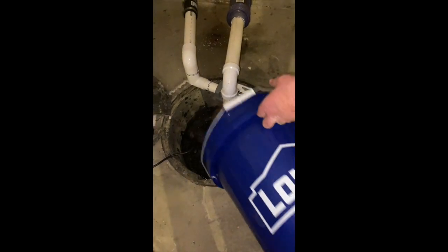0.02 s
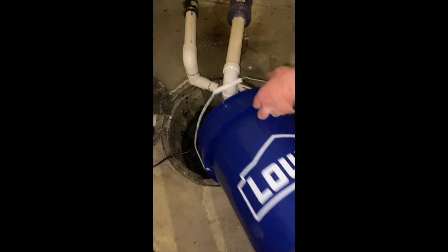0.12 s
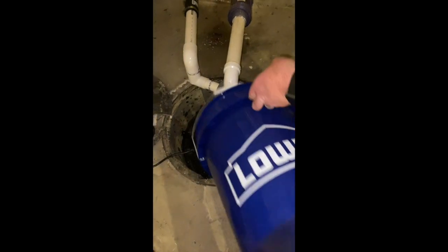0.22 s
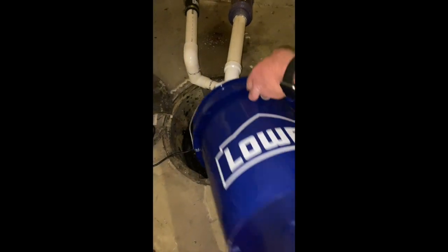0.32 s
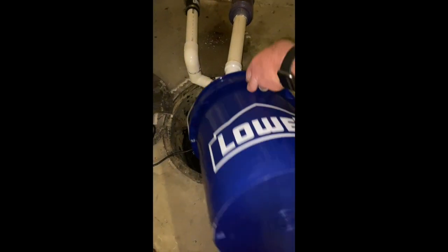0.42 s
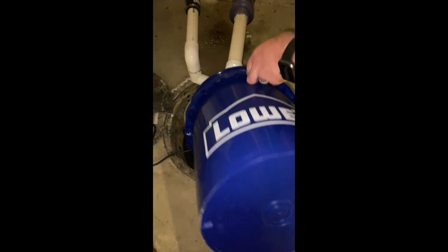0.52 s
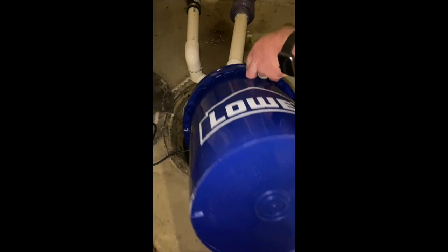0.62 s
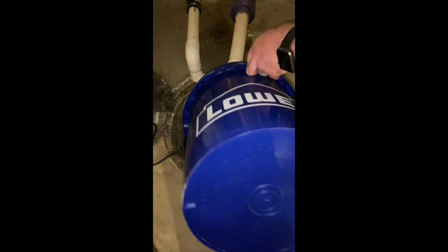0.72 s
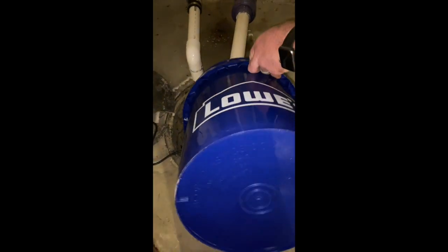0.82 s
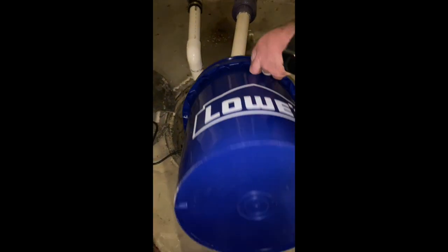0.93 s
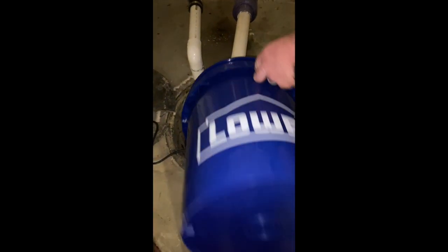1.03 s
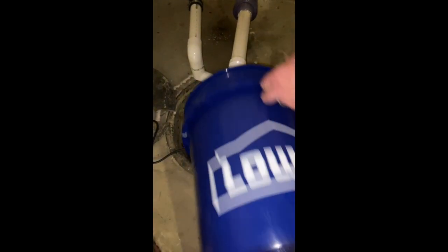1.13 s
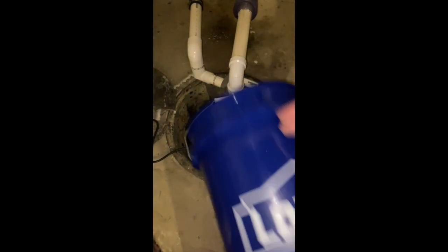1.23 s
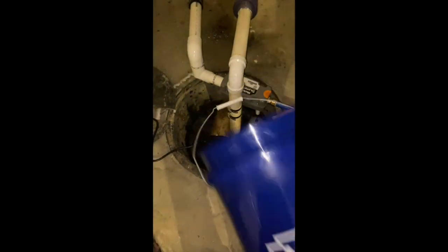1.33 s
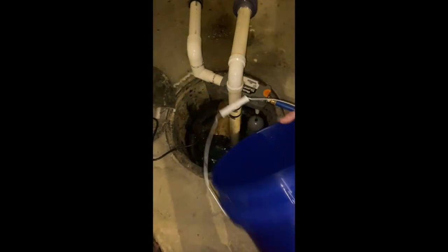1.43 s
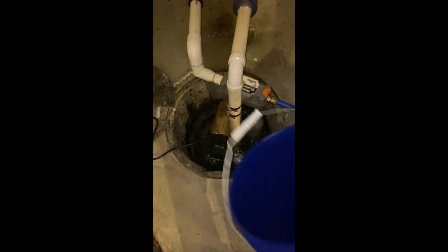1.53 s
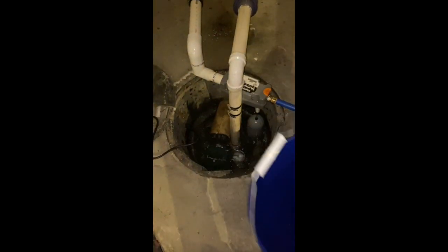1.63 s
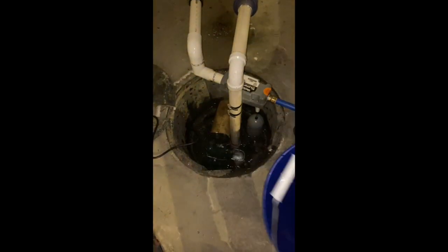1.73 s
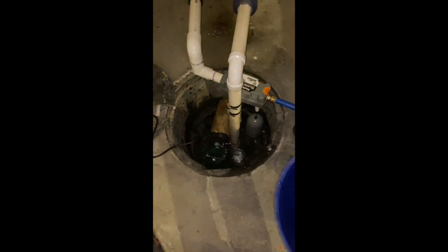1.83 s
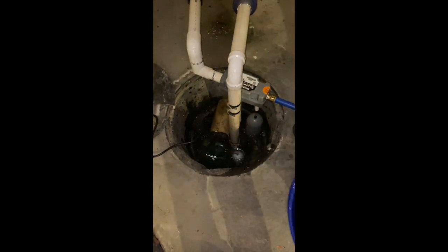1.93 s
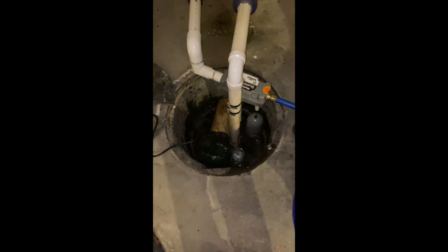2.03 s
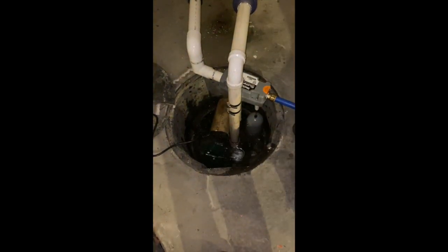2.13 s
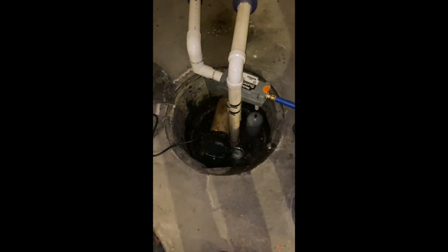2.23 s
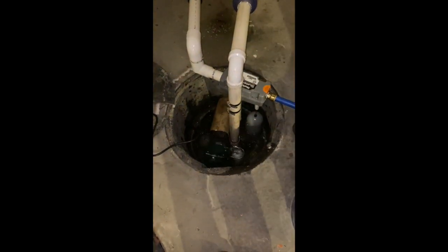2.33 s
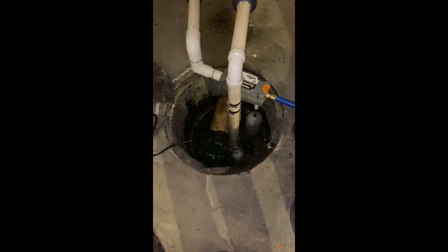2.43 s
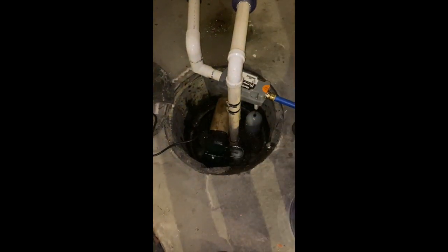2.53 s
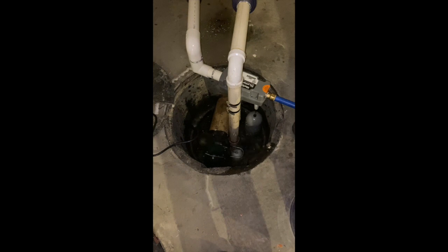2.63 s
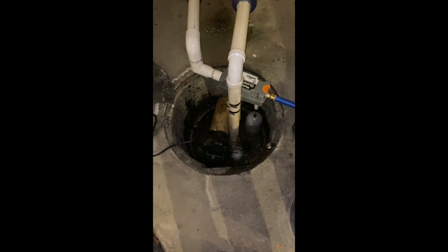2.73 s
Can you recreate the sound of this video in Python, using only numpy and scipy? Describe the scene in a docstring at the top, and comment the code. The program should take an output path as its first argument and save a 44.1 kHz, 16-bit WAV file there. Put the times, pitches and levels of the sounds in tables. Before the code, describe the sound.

A hollow plastic bucket knocks and clatters in a quiet concrete basement. Thin water splashes into a pit, with a short handle drag and loud clacks around 0.25-0.4 s, low gulps at 0.45-0.75, fading by 0.9. Light knocks come at 1.05-1.2, a sharp clack and scrape at 1.35. A deep hollow set-down thump lands at 2.0, then the handle slaps at 2.36 and the bucket rocks to rest.

```python
"""A concrete basement with a sump pit, heard on two microphones, pit and bucket a little to the right.
The last water runs from a plastic bucket: coloured noise for spray, ringing resonators for bubbles, sines
for gulps. The wire handle clacks and drags: noise through the wall's modes, plus single rings. The empty
bucket is set down with a hollow thump of decaying bottom modes, the handle drops against its side, and
it rocks to rest. Low rumble and still air lie underneath."""
import sys
import numpy as np
from scipy import signal
from scipy.fft import rfft, irfft
from scipy.io import wavfile
from scipy.ndimage import uniform_filter1d

SR = 44100
rng = np.random.default_rng(int(sys.argv[2]) if len(sys.argv) > 2 else 0)


def transcribe(u):
    """Save the signal u as a 16-bit wav file named by the first command-line argument.

    u: samples, shape (n,) or (channels, n), limited to [-1, 1]; the rate is SR.
    q: integer samples, one column per channel.
    """
    v = np.clip(np.atleast_2d(u).T, -1, 1)
    q = np.round(v * 32767).astype(np.int16)
    wavfile.write(sys.argv[1], SR, q)


N = 121275
TIME = np.arange(N) / SR

# Microphones: likeness of left and right, limited to -1..1 in use; it swings in the treble
# [f/Hz, likeness]
LIKENESS = [(60, 1), (140, 0.99), (290, 0.92), (600, 0.13), (1200, -0.043), (2100, 0.46), (5200, 0.48),
            (6300, -0.2), (7100, -1.49), (7900, -1.19), (8900, 0.19), (9900, 1), (11000, 0.67),
            (12000, 0.22), (13100, -1.5), (14200, -0.7), (15500, -0.68)]
# Place of pit and bucket, a little to the right [f/Hz, left minus right/dB]
SIDE_BALANCE = [(150, -0.4), (550, -2), (1050, -4.5), (2000, -0.26)]
DIFFUSE_SHARE = 0.55   # power share of the diffuse part in the left-right difference
CUTOFF_HZ = 16900
# Room tail after a contact, relative to its direct sound
ROOM_T60_S, ROOM_DB, TICK_ROOM_DB, RING_ROOM_DB = 0.56, -21.5, -18, -29
BLOW_LENGTH_S = 0.6   # every blow ends here, tail included

# Still air of the basement [f/Hz, density/dB per Hz]
AIR_COLOUR = [(110, -4.5), (155, 2.5), (200, -11), (400, -14), (1200, -19.5), (3000, -26), (9000, -31)]
AIR_DB = -52
# Flexing of the swung bucket [t/s, level/dB], and its rumble [f/Hz, density/dB per Hz]
FLEX_LEVEL = [(.24, -66), (.265, -21), (.32, -49.5), (.45, -51), (.56, -45), (.72, -51), (1.02, -54.5),
              (1.06, -35), (1.12, -31.5), (1.16, -39), (1.25, -40), (1.36, -50), (1.8, -62), (1.85, -34.5),
              (1.9, -44.5), (1.99, -41.5), (2.03, -28), (2.13, -55.5), (2.35, -49.5), (2.42, -32),
              (2.6, -52)]
RUMBLE_COLOUR = [(20, -32), (35, -3.5), (55, -3), (90, 3.5), (130, -6.5), (200, -12.5), (400, -42),
                 (1000, -52.5)]

# Strength of the pour [t/s, level/dB]
POUR_LEVEL = [(0, -41), (.12, -40.5), (.18, -38.5), (.3, -42), (.43, -42), (.56, -32.5), (.65, -37),
              (.74, -42.5), (.84, -51.5), (.92, -62), (1.5, -63.5), (1.72, -56), (1.9, -63.5),
              (2.75, -71.5)]
# Spray in the pit [f/Hz, density/dB per Hz]
SPRAY_COLOUR = [(60, -41.5), (200, 5), (500, -6.5), (1000, -4), (2000, 0), (2800, -4), (5700, -6),
                (7500, -11), (16000, -14)]
# Spray relative to the pour; spread of its flicker and of the lowest band's swells
SPRAY_DB, SPRAY_FLICKER_DB, SPRAY_LUMPS_DB = 2, 0.5, 3.5
# Bubbles relative to the pour; each loses 60 dB in BUBBLE_CYCLES
BUBBLES_PER_S, BUBBLE_DB, BUBBLE_CYCLES = 1500, -8.5, 16
BUBBLE_LOW_HZ, BUBBLE_HIGH_HZ = 500, 5230
# Air pockets that gulp and plop in the pit [t/s, f/Hz, level/dB]
GULPS = [(0.435, 310, -31), (0.453, 280, -28), (0.494, 313, -25.5), (0.557, 291, -30), (0.62, 309, -27.5),
         (0.757, 280, -33), (0.758, 1273, -33.5)]
GULP_ATTACK_S, GULP_T60_S, GULP_RISE_PER_S = 0.0021, 0.085, 0.36   # rise: share of the pitch

# Clicks of the wire and crunches of grit [t/s, level/dB, attack/s, t60/s]
CLICKS = [(1.308, -36, 0.00027, .02), (1.318, -41, .0003, .025), (1.596, -42, .0003, 0.048),
          (2.055, -35.5, 0.02, 0.17), (2.257, -50.5, 0.00038, .06)]
# Bright colour of those touches [f/Hz, density/dB per Hz]
CLICK_COLOUR = [(3000, -11.5), (10000, -1), (14000, -10)]
# Handle dragging in its sockets [t/s, length/s, scrape level/dB, ring f/Hz, ring level/dB]
SCRAPES = [(0.152, 0.27, -34, 1840, -38), (1.041, 0.085, -39.5, 1070, -45),
           (1.336, 0.053, -30.5, 2336, -31.5), (1.635, 0.15, -52.5, 1663, -55),
           (2.022, 0.089, -34.5, 1712, -33.5)]
SCRAPE_ATTACK_S, SCRAPE_RELEASE_T60_S = 0.0055, 0.15
SCRAPE_FADE_DB, SCRAPE_ROUGH_DB = 10.5, 3.5   # fade over the drag; spread of the roughness
SCRAPE_HALF_WIDTH_HZ = 29   # from the centre to 6 dB down

# Handle and rim striking the bucket
# [t/s, clack level/dB, hollow level/dB, tick level/dB, strongest ring f/Hz, ring level/dB]
CONTACTS = [(0.243, -16, -25, -20.5, 1910, -25), (.250, -10, -12.5, -18, 1986, -8),
            (0.26, -8.5, -43, -22, 1350, -5.5), (0.271, -39, -45, -35, 980, -11),
            (0.302, -27, -48, -50, 1310, -16), (0.363, -16.5, -31, -30, 1332, -19),
            (.396, -25.5, -33, -59, 972, -26.5), (.758, -44, -34, -40, 820, -27.5),
            (0.8, -29.5, -49, -58, 1243, -35), (1.072, -29.5, -35.5, -48, 747, -30),
            (1.089, -33, -38, -49, 2140, -38), (1.142, -31, -40, -38.5, 1760, -26.5),
            (1.161, -24, -29.5, -40, 1090, -25), (1.1925, -22.5, -22, -42, 1430, -37),
            (1.223, -38, -52, -44.5, 1574, -31), (1.351, -14, -26, -25, 2146, -13),
            (1.435, -32, -49, -51, 1015, -33.5), (1.472, -37.5, -57, -53.5, 1830, -36),
            (2, -34, -17.5, -58, 990, -33), (2.351, -26.5, -49, -24.5, 2060, -18.5),
            (2.359, -8, -28, -22.5, 976, -5), (2.367, -11.5, -20, -43, 2122, -12),
            (2.398, -22.5, -16, -37, 781, -20.5), (2.418, -23.5, -20.5, -54, 2020, -50),
            (2.508, -32.5, -34.5, -37, 1003, -29), (2.742, -43, -31, -64, 830, -39)]
ATTACK_S = 0.0016   # time constant
CLACK_T60_S, HOLLOW_T60_S, TICK_T60_S, RING_T60_S = 0.071, 0.099, 0.12, 0.087
# Crowded modes of the bucket wall [f/Hz, width/Hz, level/dB]
WALL = [(785, 160, -1.5), (965, 13, 10), (1130, 190, 2.5), (1350, 20, 4.5), (1537, 320, 2), (1720, 150, 1),
        (1910, 45, 1.5), (2080, 390, -1.5), (2167, 20, 9)]
# Clearest, longest-ringing modes of the wall [f/Hz]
WALL_MODES_HZ = [782, 962.6, 1073, 1220, 1333, 1518, 1710, 1965, 2119, 2241, 2705]
MODES_DB, MODES_T60_S = -13, 0.25   # level relative to the clack
# Boxy sound of the inside [f/Hz, density/dB per Hz]
HOLLOW_COLOUR = [(90, -27), (200, -7.5), (330, 1.5), (400, -6.5), (480, 12.5), (580, -2), (740, -4.5),
                 (1100, -38.5)]
# Hard tick of the contact [f/Hz, density/dB per Hz]
TICK_COLOUR = [(1200, -21.5), (2500, 1), (3500, 0), (5800, -2), (10000, -7), (16000, -11.5)]
RIPPLE_DB = 2   # unevenness of the many standing waves of the basement and pit
# Thin ring of the wire handle itself [f/Hz]; each tone's level is relative to the tick
WIRE_HZ = (2713, 3790, 4274, 4410)
WIRE_DB = -19

# Knocks on the bucket's bottom [t/s, level/dB, extra level of upper modes/dB]
THUMPS = [(1.193, -48, 0), (2.002, -12.5, 6), (2.398, -19.5, 9), (2.459, -25.5, 11.5), (2.546, -47, 23.5)]
# Modes of the bottom [f/Hz, level/dB, t60/s]
BOTTOM = [(111.8, -1.5, 0.31), (224, -2, 0.14), (282.2, -12.5, 0.12), (475, -17, 0.17), (568, -35, 0.076)]
THUMP_ATTACK_S, THUMP_TAIL_T60_S = 0.0025, 0.46
THUMP_TAIL_DB = -12.5   # for the two lowest modes


def from_db(db):
    """Decibels to gain."""
    return 10 ** (np.asarray(db) / 20)


def rms_one(x):
    """Scale to rms 1."""
    return x / np.sqrt(np.mean(x ** 2) + 1e-20)


def in_time(rows):
    """Read a time table at every sample."""
    return np.interp(TIME, *np.transpose(rows))


def at_hz(points, hz):
    """Read a frequency table on a log-frequency axis."""
    f, v = np.transpose(points)
    return np.interp(np.log(hz + 1), np.log(f), v)


def pan(hz):
    """Left and right gains at a frequency."""
    return from_db(at_hz(SIDE_BALANCE, hz) * np.array([[1], [-1]]) / 2)


def fade(t, t60):
    """Gain of a decay that loses 60 dB in t60."""
    return np.exp(-np.log(1000) * t / t60)


def wobble(count, size):
    """Smooth random values of rms 1, averaged twice over size samples."""
    once = uniform_filter1d(rng.standard_normal(count), size)
    return rms_one(uniform_filter1d(once, size))


def even(x, size):
    """Hold the short-term level of a noise at 1."""
    power = uniform_filter1d(np.mean(x ** 2, axis=0), size)
    return x / np.sqrt(power + 1e-12)


def noise(gain_at):
    """Stereo noise of a given colour, partly direct and partly diffuse; rms 1."""
    hz = np.fft.rfftfreq(N, 1 / SR)
    direct, other = rfft(rng.standard_normal((2, N)))
    alike = np.clip(at_hz(LIKENESS, hz), -1, 1)
    # The quarter-turned direct part makes a phase difference, the other noise a diffuse one
    side = np.sqrt(DIFFUSE_SHARE) * other + 1j * np.sqrt(1 - DIFFUSE_SHARE) * direct
    stereo = np.sqrt(1 + alike) * direct + np.sqrt(1 - alike) * side * [[1], [-1]]
    return rms_one(irfft(pan(hz) * gain_at(hz) * stereo, N))


def coloured(points):
    """Stereo noise with a tabled spectrum; rms 1."""
    return noise(lambda hz: from_db(at_hz(points, hz)))


def blow(s, attack, t60, tail_db, tail_t60):
    """Envelope of a blow: quick rise, fast decay, then a weaker tail in the room."""
    out, start = np.zeros(N), int(s * SR)
    t = TIME[:min(int(BLOW_LENGTH_S * SR), N - start)]
    decay = np.hypot(fade(t, t60), from_db(tail_db) * fade(t, tail_t60))
    out[start:start + len(t)] = (1 - np.exp(-t / attack)) * decay
    return out


def tone(hz, s):
    """One steady mode, its phases at the two microphones set apart by their likeness."""
    apart = np.arccos(np.clip(at_hz(LIKENESS, hz), -1, 1)) / 2
    return pan(hz) * np.sin(2 * np.pi * hz * (TIME - s) + apart * np.array([[1], [-1]]))


def air():
    """Still air of the basement: steady, mostly low noise."""
    return from_db(AIR_DB) * coloured(AIR_COLOUR)


def flex_rumble():
    """The swung bucket flexes: level-held low noise follows its strength."""
    return from_db(in_time(FLEX_LEVEL)) * even(coloured(RUMBLE_COLOUR), size=1800)


def lumpy(x):
    """Let each half octave of the splash swell and sink on its own, most in the lower bands; rms 1."""
    spectrum, out = rfft(x), 0
    hz = np.clip(np.fft.rfftfreq(N, 1 / SR), 250, 8000)
    step = 2 * np.log2(hz / 250)   # half octaves above 250 Hz
    for k in range(11):
        band = irfft(spectrum * np.maximum(1 - abs(step - k), 0), N)
        out = out + band * from_db(SPRAY_LUMPS_DB * (1 - k / 20) * wobble(N, size=350))
    return rms_one(out)


def spray():
    """Splashing water as coloured noise, flickering as a whole and in half-octave bands."""
    level = SPRAY_DB + SPRAY_FLICKER_DB * wobble(N, size=120)
    return from_db(level) * lumpy(coloured(SPRAY_COLOUR))


def bubbles():
    """Small bubbles: random impulses ring damped resonators at 30 pitches."""
    sizes = from_db(7.5 * np.minimum(rng.exponential(1, N), 4))
    signs = rng.choice([-1, 1], N)
    births = rng.random(N) < BUBBLES_PER_S / SR
    impulses = sizes * signs * births
    pitches = np.geomspace(BUBBLE_LOW_HZ, BUBBLE_HIGH_HZ, 30)
    dealt = rng.integers(0, len(pitches), N)   # which pitch each bubble gets
    sides = 1 + rng.standard_normal((2, N))   # its strength at each microphone
    out = 0
    for k, hz in enumerate(pitches):
        r, w = fade(1 / SR, BUBBLE_CYCLES / hz), 2 * np.pi * hz / SR
        struck = impulses * sides * (dealt == k) + 1e-18
        out = out + signal.lfilter([np.sin(w)], [1, -2 * r * np.cos(w), r * r], struck)
    return from_db(BUBBLE_DB) * rms_one(out)


def water():
    """Spray and small ringing bubbles, both following the strength of the pour."""
    return from_db(in_time(POUR_LEVEL)) * (spray() + bubbles())


def gulps():
    """Large bubbles, each a sine rising in pitch as it dies."""
    out = 0
    for s, hz, db in GULPS:
        t = np.maximum(TIME - s, 0)
        envelope = (1 - np.exp(-t / GULP_ATTACK_S)) * fade(t, GULP_T60_S)
        rising = np.sin(2 * np.pi * hz * t * (1 + GULP_RISE_PER_S * t / 2))
        out = out + pan(hz) * from_db(db) * envelope * rising
    return out


def clicks():
    """Bright touches, too light to shake the wall: short bursts of treble noise."""
    envelope = sum(from_db(db) * blow(s, attack, t60, RING_ROOM_DB, ROOM_T60_S)
                   for s, db, attack, t60 in CLICKS)
    return envelope * coloured(CLICK_COLOUR)


def wall_gain(hz):
    """The wall's resonances side by side, falling off steeply above 2600 Hz and gently below 350 Hz."""
    power = sum(from_db(db) ** 2 / (1 + (2 * (hz - f) / width) ** 2) for f, width, db in WALL)
    top = 1 / (1 + (hz / 2600) ** 8)
    bottom = hz ** 2 / (hz ** 2 + 350 ** 2)
    return np.sqrt(power * top * bottom)


def scrapes():
    """The dragging handle shakes the wall unevenly and keeps one resonance singing."""
    wall, out = even(noise(wall_gain), size=500), 0
    for s, length, db, ring_hz, ring_db in SCRAPES:
        t = np.maximum(TIME - s, 0)
        rise = 1 - np.exp(-t / SCRAPE_ATTACK_S)
        sag = from_db(-SCRAPE_FADE_DB * np.minimum(t / length, 1))
        release = fade(np.maximum(t - length, 0), SCRAPE_RELEASE_T60_S)
        resonance = noise(lambda hz: 1 / (1 + ((hz - ring_hz) / SCRAPE_HALF_WIDTH_HZ) ** 2))
        singing = from_db(ring_db) * even(resonance, size=900)
        rough = from_db(db + SCRAPE_ROUGH_DB * wobble(N, size=200)) * wall
        out = out + rise * sag * release * (rough + singing)
    return out


def wall_ringing():
    """The wall's clearest modes, as narrow noise bands, ring on after every contact."""
    power = sum((from_db(db + MODES_DB) * blow(s, ATTACK_S, MODES_T60_S, ROOM_DB, ROOM_T60_S)) ** 2
                for s, db, *_ in CONTACTS)
    modes = noise(lambda hz: sum(1 / (1 + ((hz - f) / 5) ** 2) for f in WALL_MODES_HZ))
    return np.sqrt(power) * even(modes, size=1500)


def clacks():
    """Each contact shakes the wall, the inside and a hard tick; one mode stands out, by where it lands."""
    wall = hollow = tick = rings = 0   # the first three add up as power
    for s, clack_db, hollow_db, tick_db, ring_hz, ring_db in CONTACTS:
        wall_blow = blow(s, ATTACK_S, CLACK_T60_S, ROOM_DB, ROOM_T60_S)
        hollow_blow = blow(s, 2 * ATTACK_S, HOLLOW_T60_S, ROOM_DB, ROOM_T60_S)
        tick_blow = blow(s, ATTACK_S, TICK_T60_S, TICK_ROOM_DB, ROOM_T60_S)
        ring_blow = blow(s, ATTACK_S, RING_T60_S, RING_ROOM_DB, ROOM_T60_S)
        wall = wall + (from_db(clack_db) * wall_blow) ** 2
        hollow = hollow + (from_db(hollow_db) * hollow_blow) ** 2
        tick = tick + (from_db(tick_db) * tick_blow) ** 2
        rings = rings + from_db(ring_db) * ring_blow * tone(ring_hz, s)
    shell = np.sqrt(wall) * even(noise(wall_gain), size=500) + rings
    inside = np.sqrt(hollow) * even(coloured(HOLLOW_COLOUR), size=900)
    wire = from_db(WIRE_DB) * np.sqrt(tick) * sum(tone(hz, 0) for hz in WIRE_HZ)
    rippled = noise(lambda hz: from_db(at_hz(TICK_COLOUR, hz) + RIPPLE_DB * wobble(len(hz), size=170)))
    return shell + inside + wire + np.sqrt(tick) * rippled


def thumps():
    """The bottom rings like a slack drum when it meets the floor: a few decaying modes."""
    out = 0
    for s, db, upper_db in THUMPS:
        for k, (hz, mode_db, t60) in enumerate(BOTTOM):
            level = from_db(db + mode_db + upper_db * (k > 0))
            tail_db = THUMP_TAIL_DB - 5 * (k > 1)
            out = out + level * blow(s, THUMP_ATTACK_S, t60, tail_db, THUMP_TAIL_T60_S) * tone(hz, s)
    return out


def scene():
    """The air of the basement, the water and the bucket, summed."""
    background = air() + flex_rumble()
    pit = water() + gulps()
    handle = clicks() + scrapes()
    return background + pit + handle + wall_ringing() + clacks() + thumps()


def record(dry):
    """Peaks are rounded by a soft limit and the top is cut steeply."""
    rounded = 1.2 * np.tanh(dry / 1.2)
    return signal.sosfilt(signal.cheby2(20, 70, CUTOFF_HZ, fs=SR, output="sos"), rounded)


dry = scene()
out = record(dry)
transcribe(out)
```